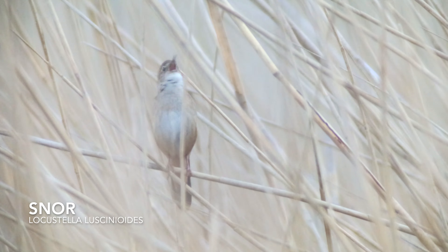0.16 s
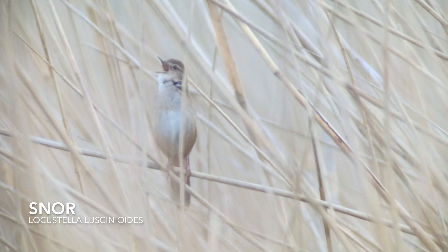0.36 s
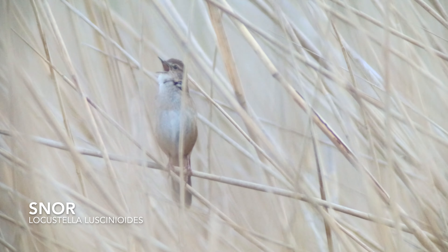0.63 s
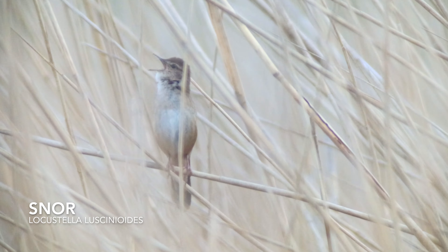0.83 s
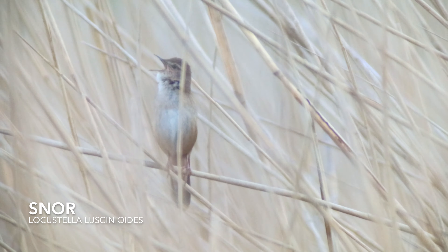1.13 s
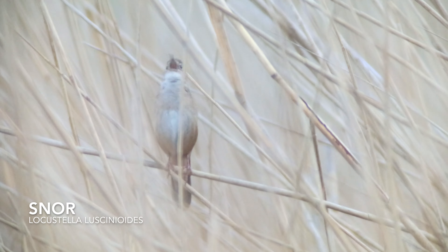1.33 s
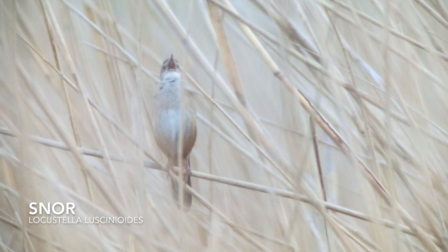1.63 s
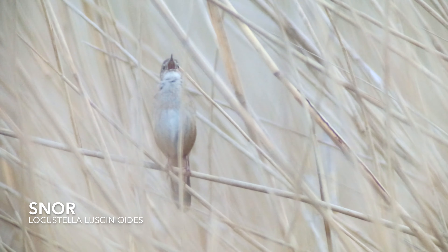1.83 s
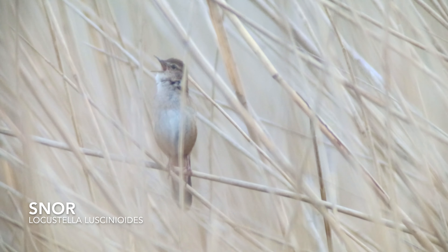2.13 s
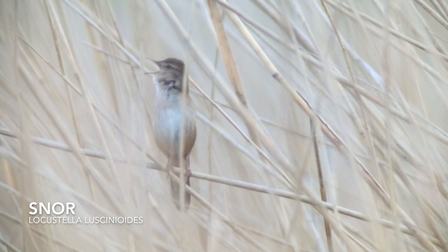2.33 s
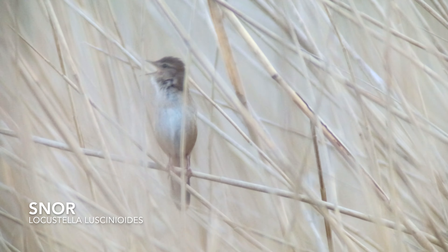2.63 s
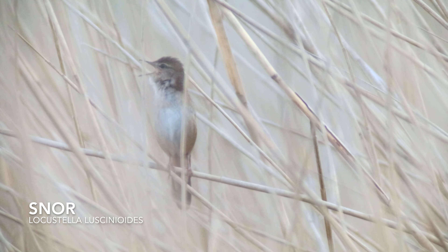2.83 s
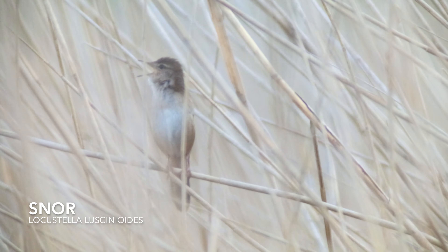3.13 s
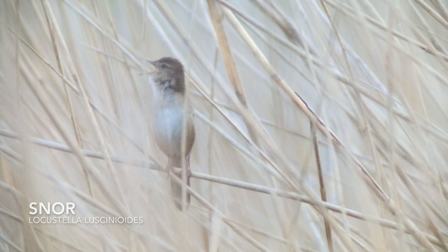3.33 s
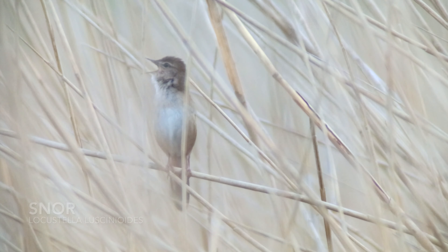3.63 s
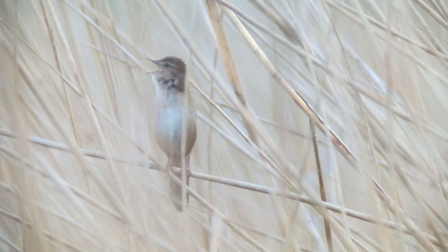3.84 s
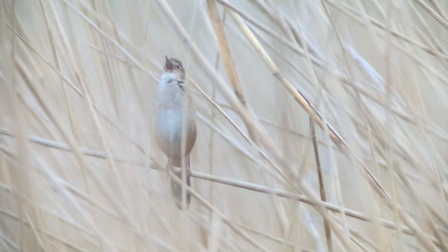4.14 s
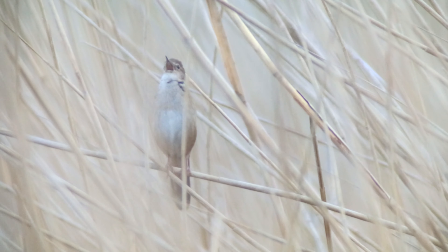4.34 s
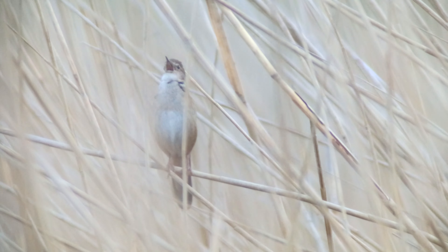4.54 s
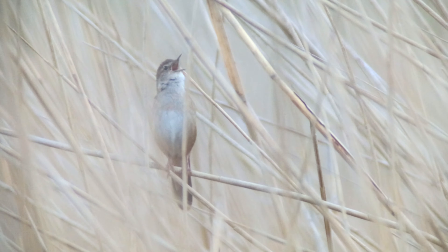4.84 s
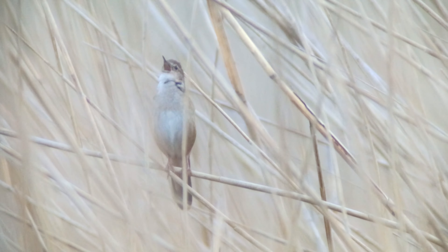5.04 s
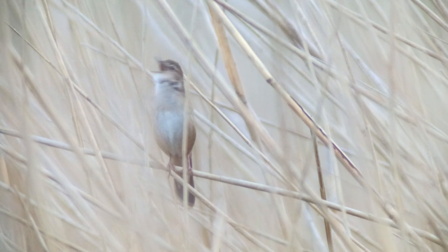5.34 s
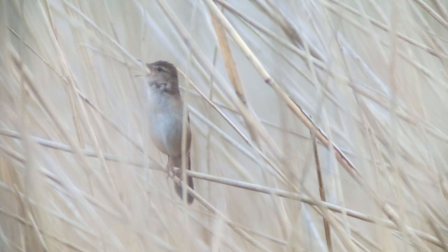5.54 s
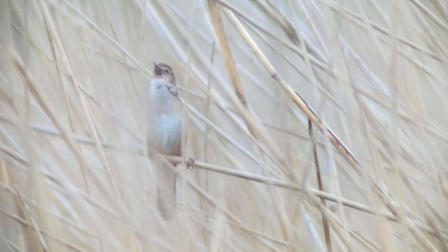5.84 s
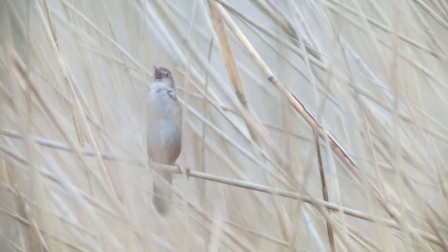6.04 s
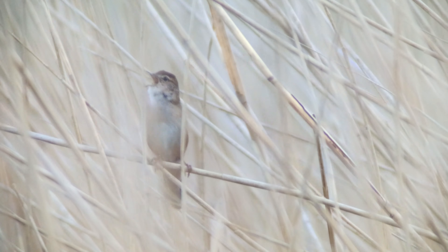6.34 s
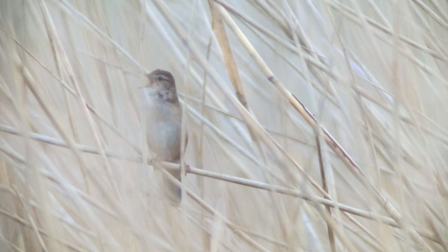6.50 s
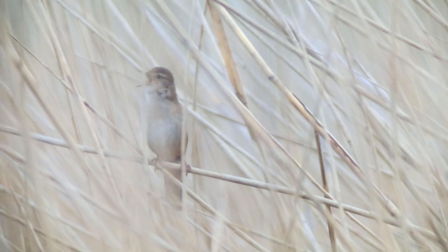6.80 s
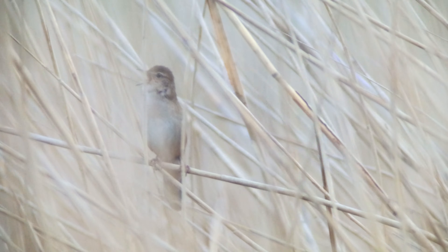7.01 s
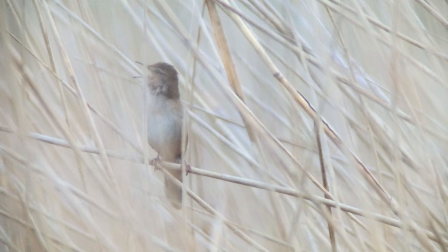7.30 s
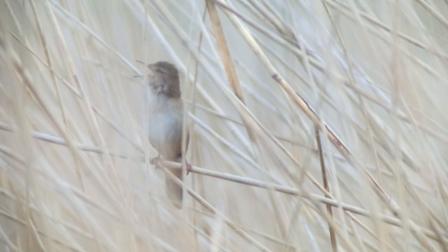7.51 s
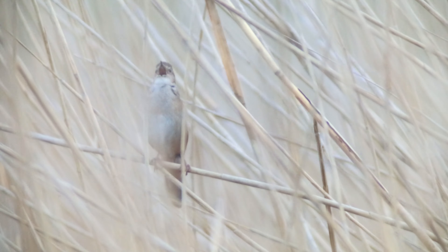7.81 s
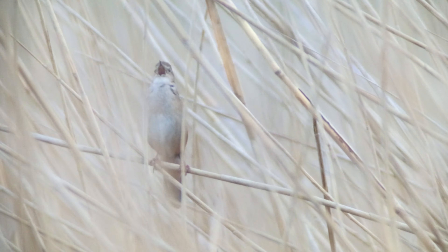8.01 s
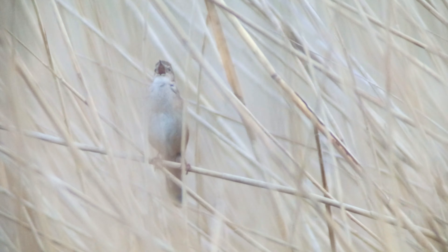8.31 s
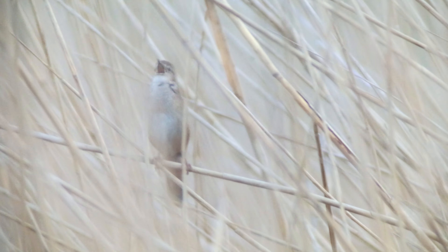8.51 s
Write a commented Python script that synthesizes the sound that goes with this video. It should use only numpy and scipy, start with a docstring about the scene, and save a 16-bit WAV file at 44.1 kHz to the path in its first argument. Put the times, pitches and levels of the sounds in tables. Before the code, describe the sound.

Continuous buzzing bird reel, about 49 tick-and-note pairs a second, close in a reedbed, with faint neighbouring chirps, sparse reed ticks and bassy wind buffeting.

```python
"""A fast dry reel runs throughout, in front of everything else: about 49 times a second, a sharp rising
tick and a rounder note near 4 kHz. A small warbler sings it in a reedbed; each note is a gliding near-sine,
echoed and smeared by the stems. Behind it a second bird chips and slurs, and a water bird hoots far off;
these are gliding near-sines too. A few reeds tick (short filtered noise bursts), and gusts rumble on the
microphone (shaped noise in swells). Under it all lies a soft open-air hush of steadier noise."""
import sys
import numpy as np
from scipy import signal
from scipy.fft import rfft, irfft
from scipy.io import wavfile
from scipy.ndimage import uniform_filter1d

SR = 44100
rng = np.random.default_rng(int(sys.argv[2]) if len(sys.argv) > 2 else 0)


def output_pcm(signal):
    """Save a mono or channel-first signal as 16-bit PCM at the path in sys.argv[1].

    Samples are clipped to [-1, 1] before scaling.
    """
    pcm = np.clip(np.atleast_2d(signal).T, -1, 1) * 32767
    wavfile.write(sys.argv[1], SR, np.round(pcm).astype(np.int16))


N = 381906  # length in samples
TIME = np.arange(N) / SR  # seconds

# Pace of the reel, steady but for one brief slackening: time_s, pairs_per_s
PACE = [(0.0, 48.9), (0.4, 49.113), (1.5, 48.923), (2.5, 48.985), (2.8, 48.374), (3.05, 48.745),
        (4.7, 49.002), (6.2, 48.968), (6.9, 48.809), (7.4, 48.936), (8.66, 48.807)]
FIRST_TICK_S = .01107
# The round note of each pair: time_s, lag_behind_tick_s, pitch_hz
ROUND_NOTE = [(0.0, .0069, 3915), (0.7, .00707, 3958), (1.15, .00748, 3972), (1.5, .0072, 3980),
              (3.6, .00706, 3972), (4.6, .00688, 3948), (6.0, .00703, 3985), (7.5, .00713, 3965),
              (8.65, .0069, 3920)]
# Relative loudness as the bird turns its head: time_s, note_level_db, tick_level_db, tick_edge_level_db
REEL_LEVELS = [(0.0, -40, -45, -60.5), (0.92, -40.5, -48.0, -60), (1.12, -42.5, -52.5, -65.0),
               (1.28, -40.5, -47.5, -60.5), (1.88, -40.5, -47, -58), (2.28, -42, -48.5, -63.5),
               (2.64, -41.0, -47, -62), (2.8, -43.0, -50, -66.0), (3.08, -40.5, -46, -60),
               (4.0, -44.0, -50, -65.5), (4.4, -39.5, -45, -58.5), (5.08, -42, -47.5, -62.5),
               (5.6, -40.5, -47, -62.0), (5.92, -43.5, -49.5, -65), (6.04, -40.5, -46, -61),
               (6.48, -43.0, -48, -61.5), (6.72, -40, -46.5, -56), (6.88, -42, -50, -60.5),
               (7.28, -41, -47.0, -63.0), (7.4, -44, -48.5, -61), (7.8, -44.0, -48.5, -63.5),
               (8.0, -38.5, -44.5, -58.5), (8.24, -41.5, -47.5, -62.5), (8.64, -35, -43, -54.5)]

# Gestures: the path of one note, before any shift in pitch, level or length.
# Columns of each: time_from_centre_s, pitch_hz, level_db
# The reel: thin edge of the tick, body of the tick, round note
EDGE = [(-.0022, 5100, -14), (-.0016, 5750, -1.5), (-.0011, 6250, -2.5), (-.0007, 6550, -5),
        (-.0002, 6750, -22)]
TICK = [(-.0014, 3400, -17), (-.0009, 3850, -11), (-.0005, 4120, -1.7), (-.0001, 4300, 0),
        (.0003, 4490, -1.5), (.0008, 4540, -10), (.0016, 4480, -21)]
NOTE = [(-.0022, 3750, -27), (-.0017, 3820, -10), (-.001, 3910, -1), (-.0005, 3935, 0), (.0005, 3965, -1.5),
        (.0014, 4000, -6.5), (.0026, 4120, -22)]
NOTE_HZ = 3960  # pitch at which the round note's gesture is written
# The second bird: chip, arched note, slur, rising note
CHIP = [(-.016, 4400, -20), (-.006, 4780, -4), (0, 4900, 0), (.006, 4830, -4), (.015, 4450, -20)]
ARCH = [(-.018, 4520, -14), (-.01, 4860, -2), (0, 5120, -2), (.006, 5430, -5), (.011, 4900, -5),
        (.018, 4370, -20)]
SLUR = [(-.032, 4870, -6), (-.024, 5400, -13), (-.014, 5750, -10), (-.005, 6500, -0.5), (.001, 7600, -12.5),
        (.004, 6100, -1), (.009, 5270, -2), (0.016, 4850, -2), (0.026, 4950, -4), (.034, 4380, -2),
        (.044, 4000, -1)]
RISE = [(-.014, 3100, -15), (-.005, 3450, -1), (.004, 3750, -1), (0.017, 4500, -4)]
# A far water bird's hoot
HOOT = [(-.15, 785, -2), (-.11, 820, -9), (-.06, 846, -4), (-.02, 900, -1), (0, 918, 4.5), (.015, 906, 0),
        (.05, 786, -15)]
# A far bird's falling note
FALL = [(-.03, 1700, -9), (-.008, 1655, 1), (.01, 1500, -2), (.035, 1340, -10)]
# Calls from further off: centre_s, gesture, highest_pitch_hz, level_db (added to the gesture's own)
CALLS_AROUND = [(.137, HOOT, 926, -49), (0.109, HOOT, 1160, -56), (3.19, CHIP, 4900, -47),
                (3.479, CHIP, 4850, -43), (3.765, CHIP, 4830, -42), (4.05, CHIP, 4900, -45),
                (4.325, CHIP, 5000, -43), (4.589, CHIP, 4880, -39), (4.84, CHIP, 4840, -41),
                (5.125, CHIP, 4960, -38), (5.396, ARCH, 5220, -43), (5.437, ARCH, 5240, -40),
                (5.478, ARCH, 5270, -42), (5.70, ARCH, 5240, -42), (5.742, ARCH, 5270, -40),
                (5.785, ARCH, 5300, -43), (5.915, ARCH, 6200, -53), (5.967, SLUR, 7570, -36),
                (6.04, RISE, 4280, -50), (6.044, ARCH, 5400, -43), (6.066, RISE, 4540, -44.5),
                (6.086, ARCH, 5260, -39), (6.13, ARCH, 5230, -45), (6.825, CHIP, 2450, -54),
                (6.871, FALL, 1690, -53), (7.69, FALL, 2690, -59), (7.93, FALL, 3050, -62),
                (8.458, CHIP, 2170, -46), (8.548, CHIP, 2010, -50), (8.592, CHIP, 2110, -53)]

# Dry ticks in the reeds: start_s, centre_hz, width_hz, decay_s, peak_db
REED_TICKS = [(0.144, 1650, 1100, 0.0016, -34.5), (2.58, 1600, 1000, .003, -42),
              (4.222, 1800, 1000, .003, -44), (4.699, 7700, 3000, .0008, -41),
              (8.217, 1480, 603, 0.0024, -37.5), (8.256, 1600, 790, 0.0016, -41),
              (8.374, 12000, 7000, .0006, -38)]
# Echoes from the nearest stems: delay_s, level_db
NEAR_STEMS = [(.00161, -15.5), (.0025, -12.5), (.005, -16.5)]

# Wind on the microphone: time_s, low_rumble_level_db, upper_flutter_level_db
WIND_LEVELS = [(0.0, -47, -62), (0.04, -47, -59), (0.29, -31.5, -49.5), (1.44, -38, -51.5),
               (1.68, -25, -39), (1.78, -27.5, -42.5), (1.9, -27.5, -32), (2.21, -35.5, -53.5),
               (2.29, -28.5, -38.5), (2.43, -30, -45.5), (2.55, -42, -53.5), (2.91, -37, -51),
               (2.96, -27.5, -38), (3.23, -36, -52.5), (3.37, -34.5, -40.5), (3.56, -28, -46),
               (3.68, -42, -58.5), (3.85, -26.5, -40.5), (5.01, -46, -57), (5.73, -43.5, -54.5),
               (6.38, -47, -57), (6.5, -34, -50), (6.6, -39.5, -53.5), (6.81, -28, -49), (6.88, -44, -56),
               (7.13, -35.5, -50.5), (7.39, -37.5, -45), (7.44, -28, -42), (7.63, -36.5, -43.5),
               (8.06, -26, -40), (8.09, -28.5, -42), (8.45, -22, -26), (8.52, -26.5, -36.5),
               (8.64, -21.5, -28)]
BREEZE_DB = -35  # low rumble of a light breeze, against which gusts are reckoned
# Relative level of the open land's low hush: time_s, level_db
LAND_LEVELS = [(0.0, -52), (1.1, -54), (7.39, -54), (7.53, -51.5), (8.4, -53)]

# Noise spectra, relative shape only. Columns of each: frequency_hz, level_db_per_hz
# The wind's buffeting
BUFFET_SPECTRUM = [(35, -18), (58, 3.5), (70, 4.5), (100, 0), (130, -4), (155, -22), (260, -58)]
# The wind's deep rumble
RUMBLE_SPECTRUM = [(8, -3.5), (20, 9), (35, -2.5), (58, 1.5), (75, -22.5), (130, -63)]
# The smallest eddies of the wind
FLUTTER_SPECTRUM = [(90, -36), (130, -1), (150, 3), (185, -.5), (215, -6.5), (250, -10.5), (350, -20.5),
                    (600, -38), (1500, -78)]
# The open-air hush
HUSH_SPECTRUM = [(30, 6.5), (120, -15), (250, 0.5), (500, -3.5), (1000, -9.5), (1500, -15.5), (2500, -20.5),
                 (3300, -21.5), (6000, -21), (8000, -25.5), (10000, -27), (13000, -27), (16000, -28.5)]
TOP_HZ = 15600  # the recorder's upper limit


def undb(db):
    """Turn decibels into a gain to multiply by."""
    return 10 ** (np.asarray(db) / 20)


def curves(table, at):
    """Join each column of a table by straight lines and read it at the given times."""
    times, *columns = np.transpose(table)
    return [np.interp(at, times, column) for column in columns]


def add(out, start_s, sound):
    """Mix a sound in from a start time, dropping whatever falls outside the scene."""
    i = int(round(start_s * SR))
    part = sound[max(-i, 0):max(N - i, 0)]
    out[max(i, 0):max(i, 0) + len(part)] += part


def walk(rate):
    """A random curve of spread 1 with `rate` new random points a second, joined by straight lines."""
    points = rng.standard_normal(int(TIME[-1] * rate) + 2)
    curve = np.interp(TIME * rate, np.arange(len(points)), points)
    return curve / curve.std()


def noise(spectrum):
    """Noise of rms 1, shaped to a spectrum and silent above its last point."""
    hz, db = np.transpose(spectrum)
    f = np.maximum(np.fft.rfftfreq(N, 1 / SR), 1)
    shape = undb(np.interp(np.log(f), np.log(hz), db, right=-np.inf))
    shaped = irfft(rfft(rng.standard_normal(N)) * shape, N)
    return shaped / shaped.std()


def whistle(gesture, ratio, overtone_db, stretch=1):
    """One note of a bird's voice organ: a gliding sine and its octave; returns start offset and sound."""
    t = np.arange(gesture[0][0] * stretch, gesture[-1][0] * stretch, 1 / SR)
    hz, db = curves(gesture, t / stretch)
    phase = 2 * np.pi * np.cumsum(hz * ratio) / SR
    octave = undb(overtone_db) * np.sin(2 * phase)
    return t[0], undb(db) * (np.sin(phase) + octave)


def warbler(tick_db=17.0, note_db=12.5, edge_db=18, overtone_db=-33, scatter_db=0.84,
            timing_s=.00012, pitch_spread=0.0048, edge_spread=0.028):  # pitch spreads are fractions
    """The reel: the bird's voice sweeps up in edge and tick, then gives the round note, varying each pair."""
    pairs = np.cumsum(curves(PACE, TIME)[0]) / SR
    beats = np.interp(np.arange(int(pairs[-1]) + 1), pairs, TIME) + FIRST_TICK_S
    chance = rng.standard_normal((len(beats), 8))
    usual_lag = np.median(np.array(ROUND_NOTE)[:, 1])
    rows = zip(beats, *curves(ROUND_NOTE, beats), *curves(REEL_LEVELS, beats), chance)
    song = np.zeros(N)
    for beat, lag, note_hz, note_level, tick_level, edge_level, c in rows:
        tick_s = beat + timing_s * c[0]
        note_s = tick_s + lag + timing_s * c[4]
        drawn_out = (lag / usual_lag) ** 2  # a later round note is also longer, and so purer
        edge_ratio = 1 + edge_spread * c[7]
        tick_ratio = 1 + pitch_spread * c[1]
        note_ratio = note_hz / NOTE_HZ + pitch_spread * c[5]
        parts = [(EDGE, tick_s, edge_ratio, edge_level + edge_db + scatter_db * c[2], 1),
                 (TICK, tick_s, tick_ratio, tick_level + tick_db + scatter_db * c[3], 1),
                 (NOTE, note_s, note_ratio, note_level + note_db + scatter_db * c[6], drawn_out)]
        for gesture, centre_s, ratio, db, stretch in parts:
            offset_s, sound = whistle(gesture, ratio, overtone_db, stretch)
            add(song, centre_s + offset_s, undb(db) * sound)
    heard = song + reedbed(song, t60=.11, wet_db=-14.5, sway_rate=1.5)
    # the nearest stems repeat every note within a few milliseconds, which ripples its spectrum
    for delay_s, db in NEAR_STEMS:
        add(heard, delay_s, undb(db) * song)
    return heard


def reedbed(dry_sound, t60, wet_db, sway_rate=3):
    """Countless stems scatter sound into a short tail; as they sway, its six echo patterns come and go."""
    t = np.arange(int(t60 * SR)) / SR  # t60: seconds for the tail to fall by 60 dB
    fade = np.exp(-np.log(1000) * t / t60) * np.minimum(t / 0.0037, 1)  # builds up over 3.7 ms
    tail = 0
    for _ in range(6):
        echoes = rng.standard_normal(len(t)) * fade
        echoes = echoes / np.linalg.norm(echoes)
        tail = tail + walk(sway_rate) * signal.fftconvolve(dry_sound, echoes)[:N]
    return undb(wet_db) * tail / np.sqrt(6)


def neighbours():
    """Other birds deeper in the reeds: gliding notes with a longer scattered tail."""
    calls = np.zeros(N)
    for centre_s, gesture, top_hz, db in CALLS_AROUND:
        ratio = top_hz / np.array(gesture)[:, 1].max()
        offset_s, sound = whistle(gesture, ratio, overtone_db=-33)
        add(calls, centre_s + offset_s, undb(db) * sound)
    return calls + reedbed(calls, t60=0.38, wet_db=-13)


def reed_ticks():
    """Dry stems tick: each is a very short noise burst through one broad resonance."""
    out = np.zeros(N)
    t = np.arange(SR // 20) / SR
    for start_s, hz, width, decay, db in REED_TICKS:
        edges = [max(hz - width / 2, 100), min(hz + width / 2, .45 * SR)]
        band = signal.butter(4, edges, "band", fs=SR, output="sos")
        burst = signal.sosfilt(band, rng.standard_normal(len(t)) * np.exp(-t / decay))
        add(out, start_s, undb(db) * burst / abs(burst).max())
    return out


def wind(rumble_db=-33.5, buffet_db=-38.8, flutter_db=0, rumble_growth=0.88, buffet_growth=1.26,
         lumpy_db=2.5, lump_rate=24):  # growth: dB per dB of gust; lump_rate: random points per second
    """Gusts press unevenly on the microphone; buffeting grows faster than rumble, and small eddies flutter."""
    low_db, upper_db = curves(WIND_LEVELS, TIME)
    gust_db = low_db - BREEZE_DB
    sizes = [(RUMBLE_SPECTRUM, rumble_db + rumble_growth * gust_db),
             (BUFFET_SPECTRUM, buffet_db + buffet_growth * gust_db),
             (FLUTTER_SPECTRUM, flutter_db + upper_db)]
    out = np.zeros(N)
    for spectrum, db in sizes:
        lumps = undb(db + lumpy_db * walk(lump_rate))
        out += lumps * eddies(spectrum)
    return out


def eddies(spectrum, steady_s=0.14):
    """Turbulence as noise with its slow swells evened out, so that the wind's levels set its strength."""
    rough = noise(spectrum)
    local_power = uniform_filter1d(rough ** 2, int(steady_s * SR))
    return rough / np.sqrt(local_power)


def air(hush_db=5, hiss_db=-47.5, split_hz=2200, flicker_db=.5, gust_lift=0.11):  # lift: dB per dB of gust
    """The open land's low hush, and a smooth high hiss that swells a little in the stronger gusts."""
    swell_db = gust_lift * np.maximum(curves(WIND_LEVELS, TIME)[0] - BREEZE_DB, 0)
    low_pass = signal.butter(2, split_hz, "low", fs=SR, output="sos")
    high_pass = signal.butter(2, split_hz, "high", fs=SR, output="sos")
    hush = signal.sosfilt(low_pass, noise(HUSH_SPECTRUM))
    hiss = signal.sosfilt(high_pass, noise(HUSH_SPECTRUM))
    hush_level_db = curves(LAND_LEVELS, TIME)[0] + hush_db + flicker_db * walk(9)
    return hush * undb(hush_level_db) + hiss * undb(hiss_db + swell_db)


def scene():
    """Add up all the sounds at one microphone, as a single channel."""
    return (warbler() + neighbours() + reed_ticks() + wind() + air())[None]


def record(dry):
    """The recorder cuts the top: a steep low-pass filter removes the highest treble."""
    low_pass = signal.ellip(10, .1, 90, TOP_HZ, fs=SR, output="sos")
    return signal.sosfilt(low_pass, dry)


dry = scene()
out = record(dry)
output_pcm(out)
```